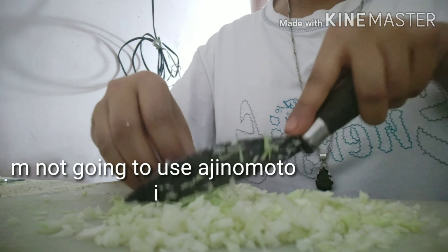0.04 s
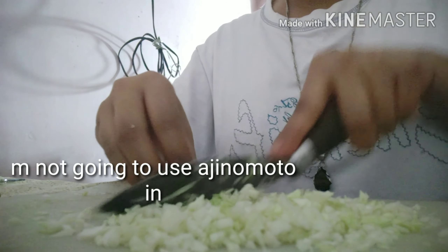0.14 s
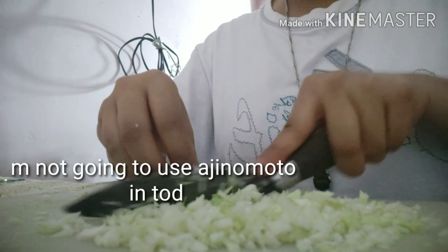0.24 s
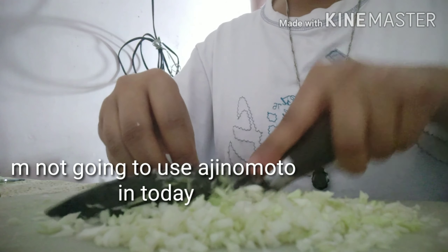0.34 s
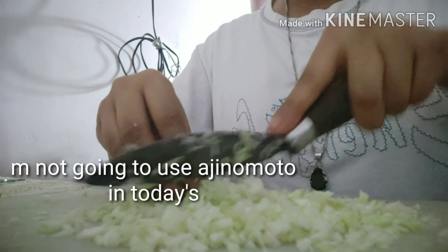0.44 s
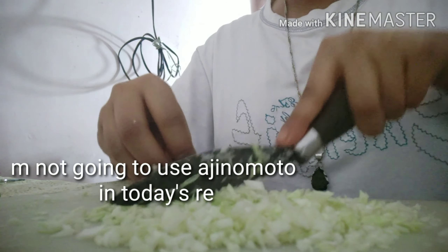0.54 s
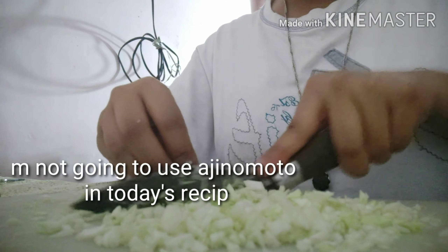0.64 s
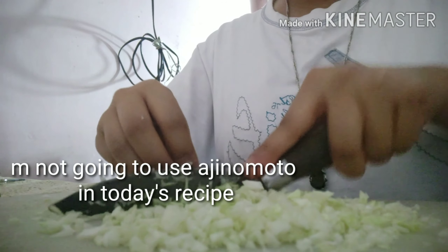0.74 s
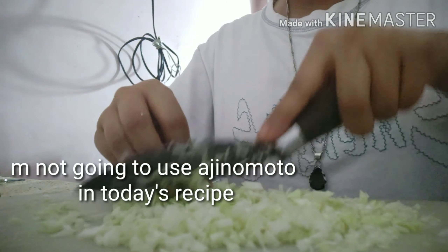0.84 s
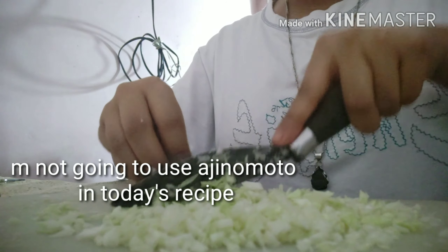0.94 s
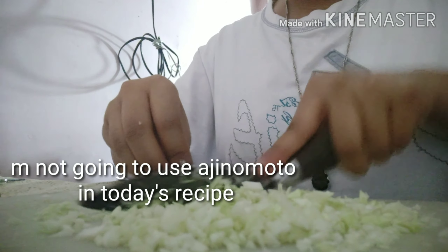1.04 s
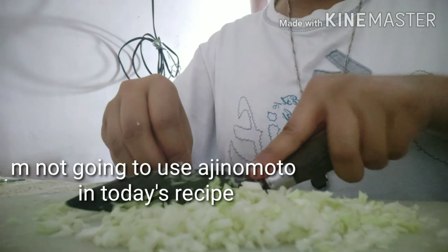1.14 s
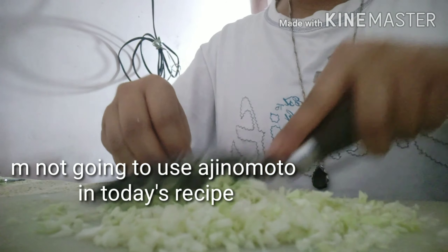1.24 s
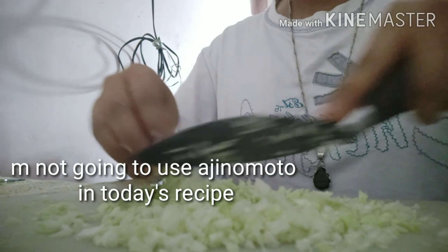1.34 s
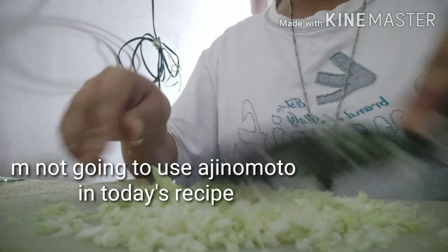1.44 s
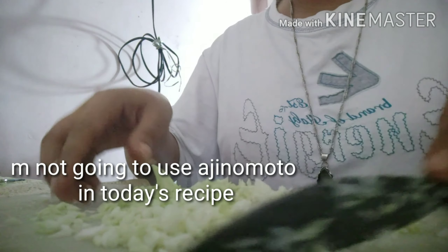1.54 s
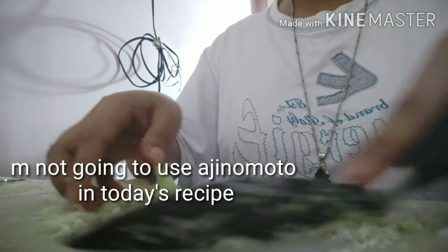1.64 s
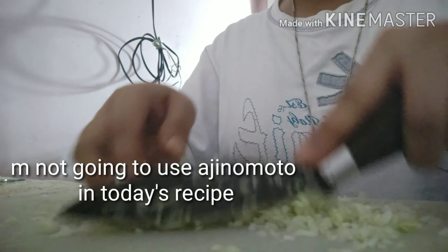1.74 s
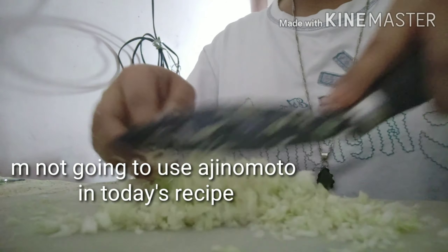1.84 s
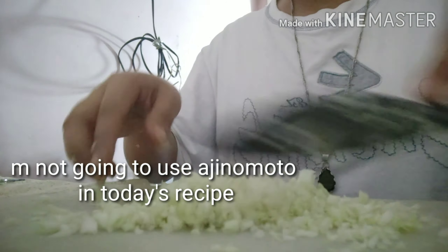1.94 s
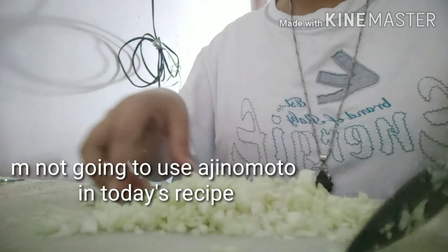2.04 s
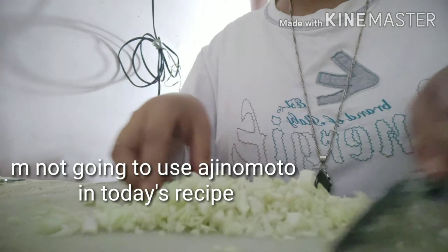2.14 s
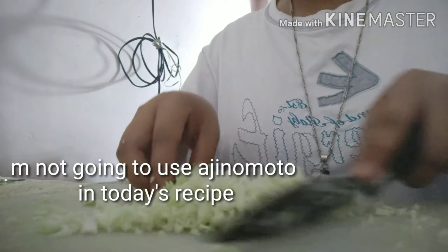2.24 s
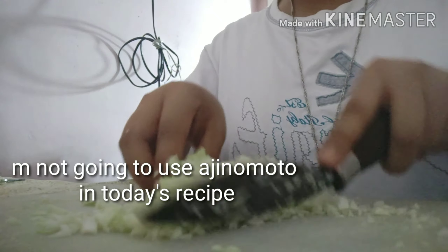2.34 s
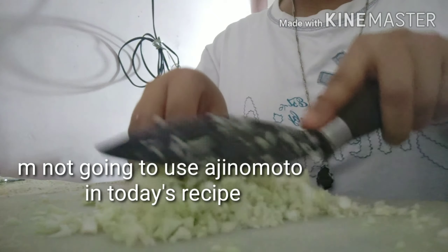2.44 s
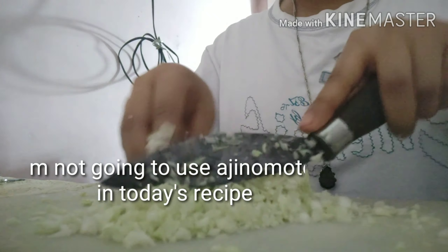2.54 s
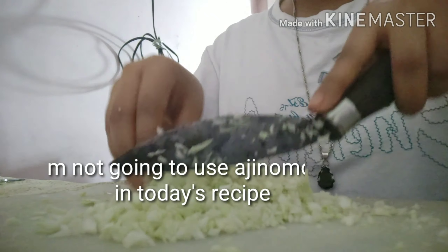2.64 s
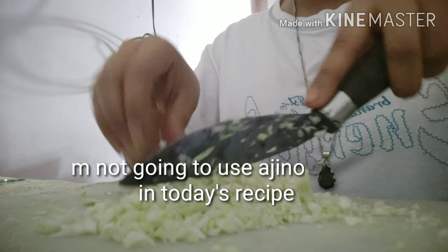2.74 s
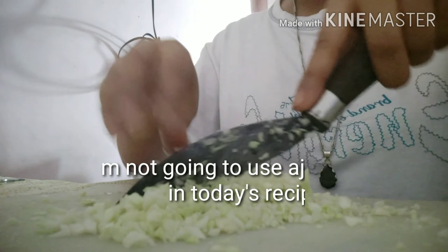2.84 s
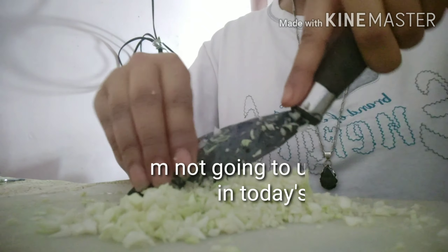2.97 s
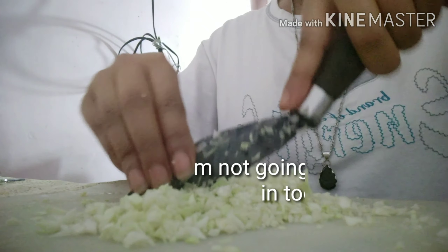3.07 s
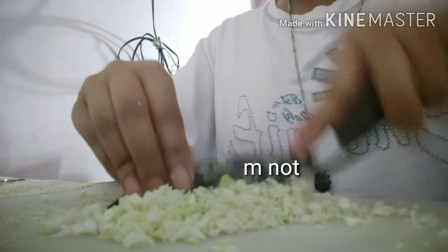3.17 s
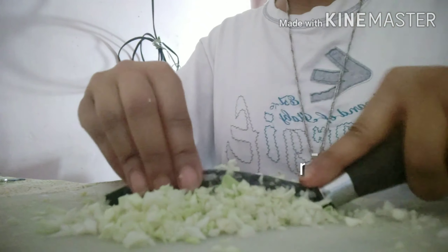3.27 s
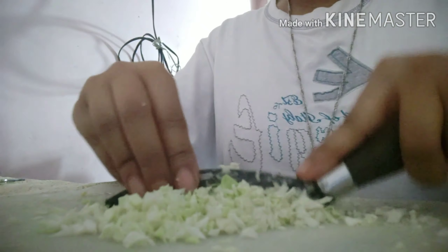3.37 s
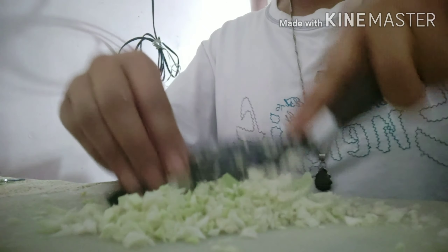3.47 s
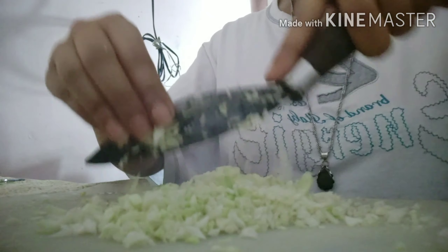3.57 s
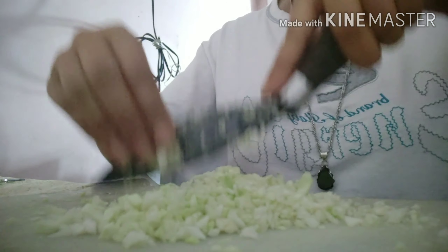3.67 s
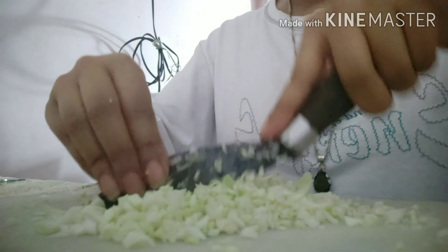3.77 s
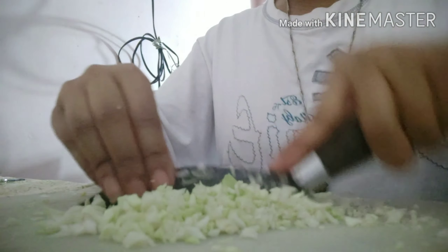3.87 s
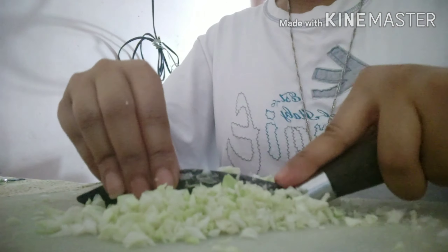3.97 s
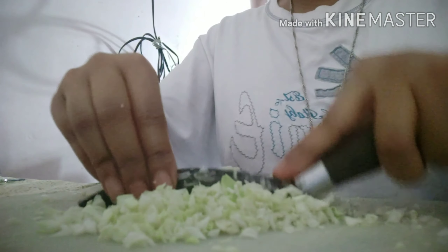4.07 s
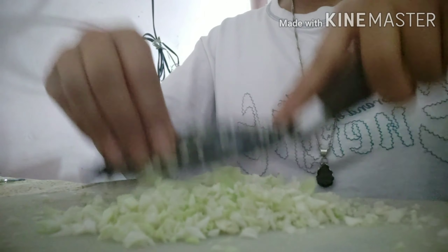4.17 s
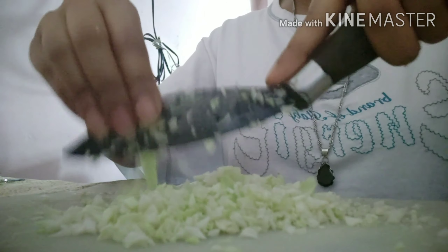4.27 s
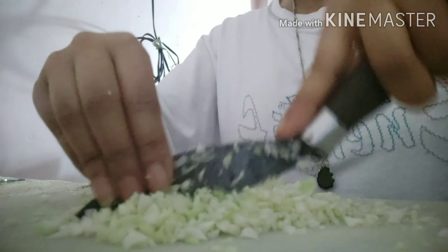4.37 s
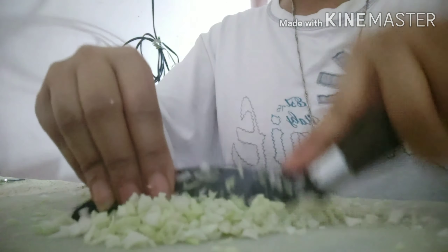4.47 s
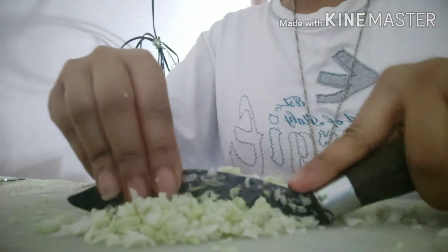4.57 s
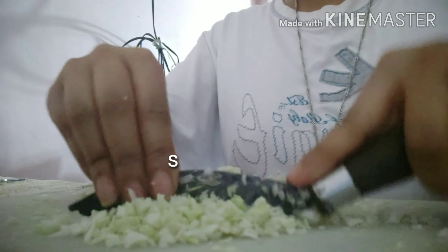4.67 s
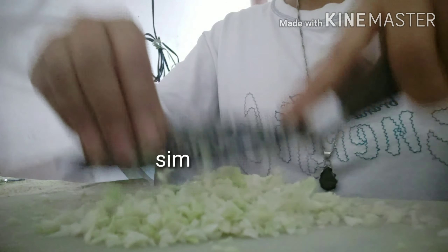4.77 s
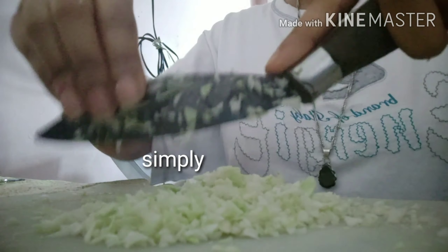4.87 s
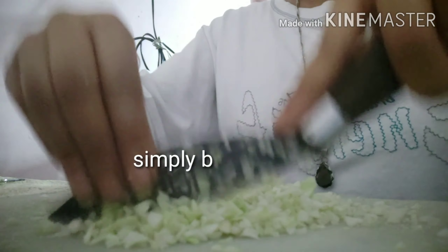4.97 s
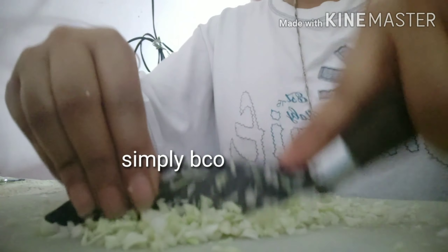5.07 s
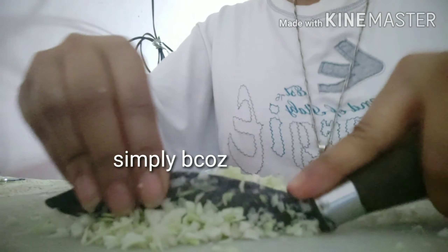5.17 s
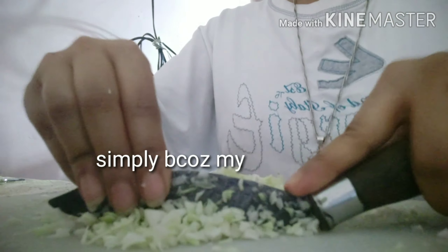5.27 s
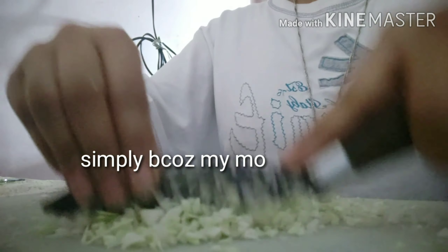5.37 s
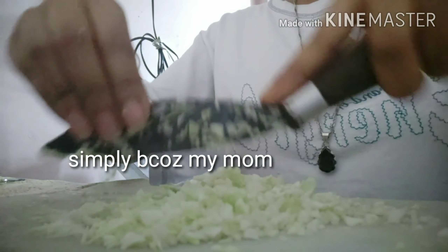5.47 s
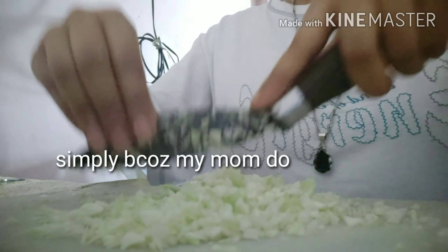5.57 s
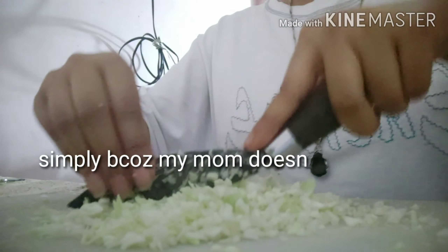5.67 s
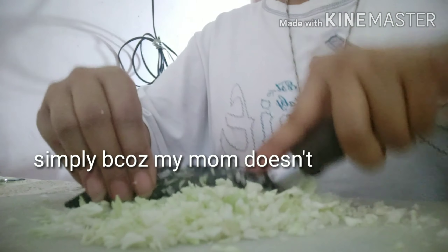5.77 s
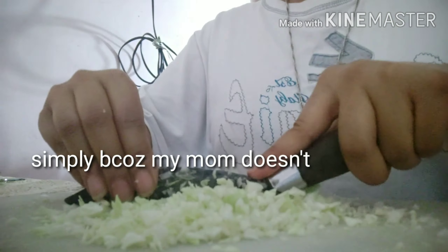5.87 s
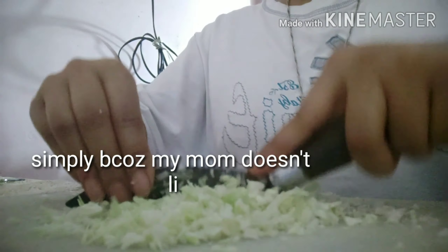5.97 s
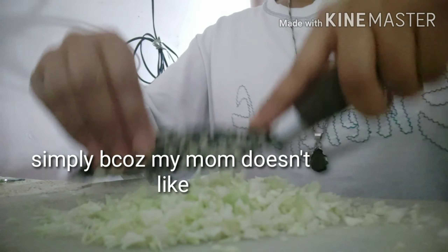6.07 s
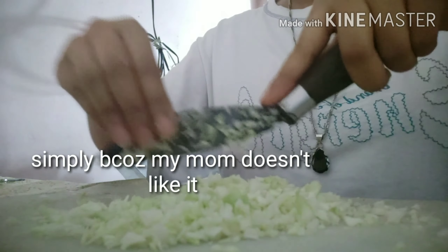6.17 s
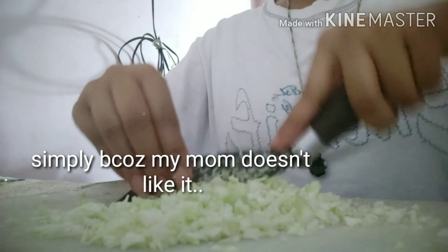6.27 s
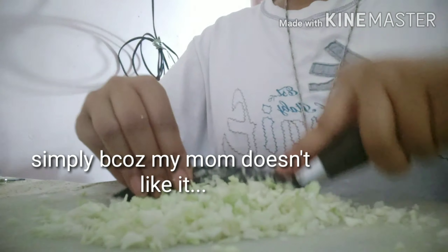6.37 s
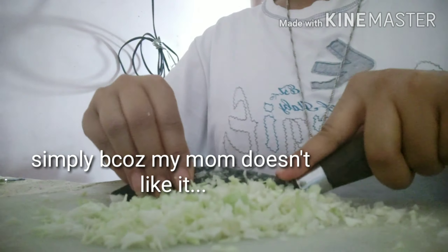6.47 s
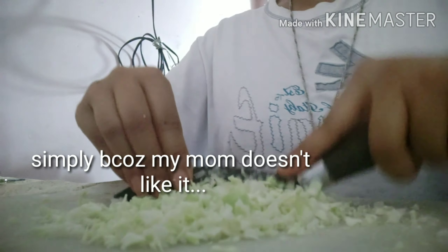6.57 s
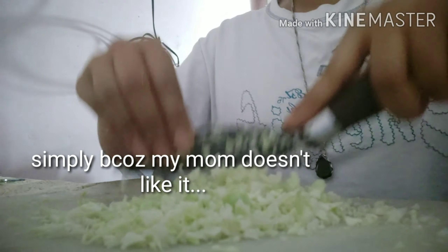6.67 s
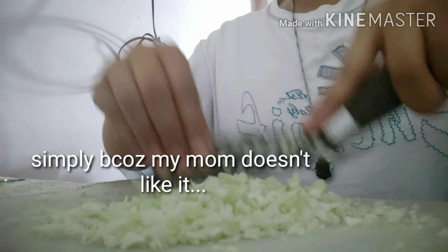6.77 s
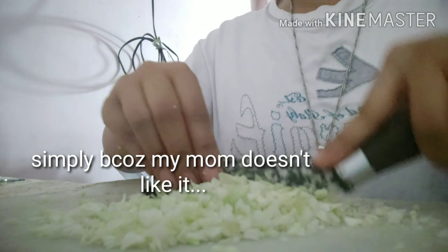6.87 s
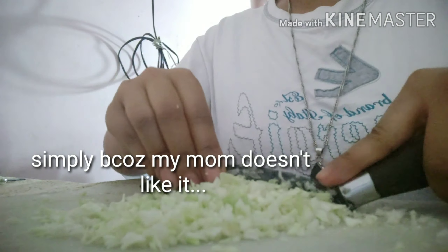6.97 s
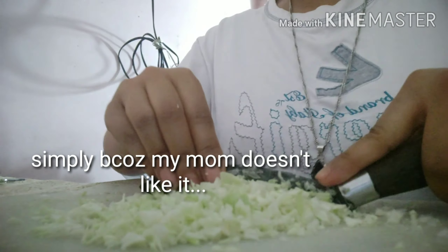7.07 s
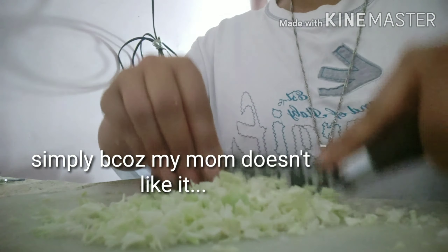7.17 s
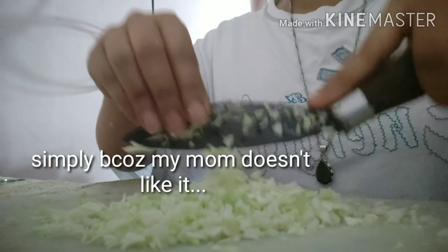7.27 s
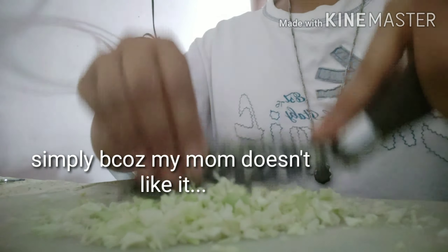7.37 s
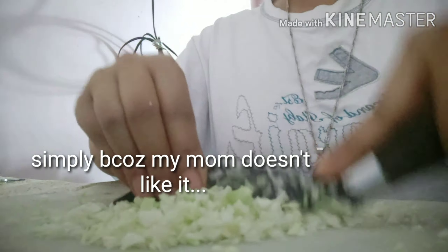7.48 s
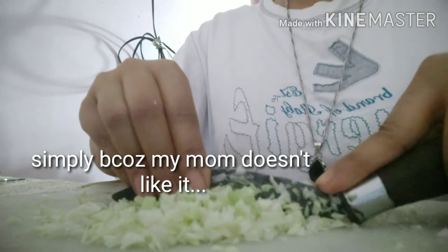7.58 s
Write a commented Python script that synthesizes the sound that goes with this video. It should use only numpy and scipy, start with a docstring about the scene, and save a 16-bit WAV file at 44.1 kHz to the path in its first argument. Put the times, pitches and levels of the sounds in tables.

```python
"""A kitchen knife chops a heap of shredded cabbage on a cutting board, close by, in a small hard-walled kitchen.
Strokes are swelling bursts of noise clicks, ringing as leaf crackle and drumming on the board, over table shake.
Blade knocks are decaying noise clicks plus ringing board and table modes; softer bumps thump and patter.
Twice the blade is set down and scraped across the board to gather the heap: stick-slip bursts of grit.
Shreds rustle and settle in sparse ticks; room reverberation, quiet air and faint gliding tones lie around it."""
import sys
import numpy as np
from scipy import signal
from scipy.fft import rfft, irfft
from scipy.io import wavfile

SR = 44100
rng = np.random.default_rng(int(sys.argv[2]) if len(sys.argv) > 2 else 0)


def master(y):
    """Save y as 16-bit WAV."""
    cut = np.clip(np.atleast_2d(y).T, -1, 1)
    pcm = np.round(cut * 32767)  # scale
    wavfile.write(sys.argv[1], SR, pcm.astype(np.int16))


N = 336042

# Event levels are mix levels within a layer, before that layer's trim.
# cutting strokes: start_s, sink_in_s, bite_s, swell_db, leaf_crackle_db, board_db, table_db
CUT_STROKES = [(0.15, 0.063, 0.024, 31, -36, -33.5, -42.5), (0.58, 0.035, 0.05, 16, -40, -36.5, -48),
               (0.99, 0.035, 0.06, 15.5, -45.5, -38, -45), (3.12, 0.11, 0.035, 24, -32.5, -31.5, -39.5),
               (3.745, .15, 0.06, 16, -42.5, -40.5, -43), (4.385, 0.1, 0.089, 20, -37.5, -33.5, -37),
               (5.09, 0.059, 0.04, 15, -37, -33.5, -44.5), (5.745, 0.054, 0.021, 26.5, -31, -26.5, -39),
               (6.31, 0.096, 0.051, 24.5, -34, -33, -37), (6.85, 0.11, 0.03, 20.5, -40.5, -38.5, -40),
               (7.428, 0.1044, 0.01, 27.5, -34, -33.5, -31)]
# share of swell_db heard in the leaves, the board and the table: share [0 to 1]
CUT_SWELL_SHARES = (0.96, 0.75, 0.38)
# blade dragged across the board: start_s, speed_up_s, full_speed_s, swell_db, edge_rasp_db, board_db
SCRAPE_STROKES = [(1.545, 0.073, 0.096, 23, -36, -26), (2.09, 0.12, 0.08, 28, -34, -27)]
# share of swell_db heard in the edge and the board: share [0 to 1]
SCRAPE_SWELL_SHARES = (1, 0.69)
# blade striking the board: start_s, knock_db, edge_click_db, table_thump_db, knock_tilt_db_per_octave
BLADE_KNOCKS = [(0.2014, -32, -37.5, -31.5, 5), (0.2377, -25.5, -52, -29.5, -4.5),
                (0.6253, -30.5, -49, -27.5, 0), (0.991, -42.5, -54, -51, 2.5),
                (1.015, -37.5, -50, -37.5, 10.5), (1.0865, -39, -39, -57.5, 4),
                (1.536, -15, -25.5, -37.5, -2.5), (2.0774, -18, -30.5, -32, -4),
                (3.127, -33, -46.5, -43, 4), (3.1361, -38, -38, -48, 4), (3.181, -41, -52.5, -52, 7),
                (3.2594, -27, -23, -32.5, 0), (3.808, -30, -48.5, -57, -2.5),
                (3.847, -35.5, -52, -47, -0.5), (3.9469, -44.5, -42, -51, 9),
                (4.4028, -35, -42.5, -42, -4.5), (4.4737, -32.5, -41, -33, -3.5),
                (4.4891, -18, -35.5, -30, -4), (5.017, -27, -41.5, -35.5, -0.3),
                (5.0907, -23.5, -33.5, -42, -3.5), (5.119, -34, -39.5, -50, 1.5),
                (5.1442, -29.5, -34, -37, -2.5), (5.18, -26.5, -25, -41.5, -0.3),
                (5.1938, -38.5, -30.5, -51, 6.5), (5.742, -35, -48.5, -57, -1),
                (5.7836, -19.5, -35.5, -24.5, 1), (5.8073, -17, -27.5, -20.5, 3.5),
                (6.3006, -20, -39.5, -32.5, -4.5), (6.4555, -36, -29.5, -46.5, -7),
                (6.8473, -24.5, -34, -29.5, 1.5), (6.916, -33.5, -47, -54, -4.5),
                (7.541, -29.5, -31, -42, 1)]
# hand leaning on the heap and bumping the table: start_s, level_db
HAND_BUMPS = [(0.529, -40), (0.948, -40.5), (3.745, -43), (4.388, -32), (4.545, -32), (5.164, -23.5),
              (5.689, -32.5), (7.546, -21)]
# blade and fingers brushing the shreds: start_s, leaf_crackle_db, board_db, length_s
SHRED_RUSTLES = [(0.27, -40, -45, 0.12), (0.502, -62, -48.5, 0.011), (0.522, -49.5, -54, 0.043),
                 (0.712, -40, -42.5, 0.074), (0.934, -50.5, -55, .03), (1.21, -43, -42, 0.045),
                 (1.937, -67, -44.5, .018), (2.033, -51, -44.5, 0.061), (2.547, -59, -45, 0.049),
                 (3.072, -51, -44.5, 0.064), (3.396, -42, -42.5, 0.048), (3.439, -41.5, -44, 0.052),
                 (3.613, -61, -52, 0.016), (3.746, -46, -38.5, 0.042), (4.09, -39.5, -41, 0.025),
                 (4.12, -37.5, -37.5, 0.027), (4.402, -31, -28.5, .02), (4.449, -37, -32, 0.011),
                 (4.707, -48, -52, 0.033), (5.012, -50, -36, 0.026), (5.682, -45, -43, 0.068),
                 (6.003, -35.5, -37.5, 0.029), (6.292, -34, -34.5, 0.023), (6.618, -40, -40, 0.023),
                 (6.833, -44, -43, 0.029), (7.431, -45.5, -42.5, 0.047)]
# faint gliding tones: start_s, length_s, start_pitch_hz, end_pitch_hz, level_db
GLIDING_TONES = [(0.363, 0.25, 346, 460, -59), (2.713, 0.18, 1570, 1604, -67.5),
                 (4.2, 0.146, 326, 296, -62), (7.228, 0.22, 349, 506, -57.5)]
# ringing modes of the board with the blade on it: pitch_hz, relative_level_db, t60_s
BOARD_MODES = [(356, 4, 0.022), (486, 5, 0.016), (780, 2.5, 0.019), (845, -1, 0.026), (963, 5.5, 0.011),
               (1352, 2, 0.026), (1536, 1.5, 0.021), (2090, -8.5, 0.0045)]
# ringing modes of the table: pitch_hz, relative_level_db, t60_s
TABLE_MODES = [(41.85, -5, 0.72), (56.5, -7, 0.15), (102, -4, 0.62), (125, -0.5, 0.13)]
# colour of the crackling leaves: frequency_hz, relative_level_db
LEAF_COLOUR = [(1200, -10), (1900, -3.5), (2300, 2.5), (3200, -4.5), (3900, -1.5), (4700, -3), (6300, -6.5),
               (9800, 0), (13500, -8)]
# colour of the board pressed by hand or blade: frequency_hz, relative_level_db
PRESSED_BOARD_COLOUR = [(100, -24), (200, 3.5), (290, -1), (430, 6), (610, -5), (810, 4.5), (930, 0.5),
                        (1080, 2), (1280, -3), (1500, 0), (1900, -21.5), (3000, -40)]
# colour of the board under the dragged blade: frequency_hz, relative_level_db
SCRAPED_BOARD_COLOUR = [(60, -22.5), (115, -1), (180, -19.5), (350, 3), (460, -3), (600, -4), (690, 0.5),
                        (930, -9), (1150, -8), (1330, -11), (1570, -5), (1850, -31), (3000, -39.5)]
# colour of the steel edge clicking: frequency_hz, relative_level_db
EDGE_COLOUR = [(900, -7.5), (2300, 2), (3100, 0), (3750, 3), (4800, -2.5), (6000, -5), (9700, -5.5),
               (13500, -14)]
# colour of the edge rasping over the board: frequency_hz, relative_level_db
RASP_COLOUR = [(900, -9), (2300, 4), (3000, 1), (3600, 0.5), (4100, -3.5), (4800, 3.5), (5900, -4.5),
               (7500, -6.5), (9700, -1.5), (13500, -11)]
# colour of the room air: frequency_hz, relative_level_db
AIR_COLOUR = [(20, -7.5), (42, -1), (60, -7.5), (85, -20.5), (110, -9.5), (145, -15.5), (240, -21.5),
              (380, -18.5), (560, -23), (1000, -31), (1650, -29.5), (2300, -39.5), (4400, -40),
              (6300, -44.5), (9500, -44.5), (14000, -49)]
# reverberation time of the kitchen: frequency_hz, t60_s
KITCHEN_T60 = [(100, 0.34), (400, 0.52), (1200, 0.5266), (4000, 0.3947), (12000, 0.3944)]
# reverberation against the direct sound: frequency_hz, level_db
KITCHEN_LEVEL = [(100, -8), (400, -12), (1200, -8), (4000, -15.5), (12000, -11.5)]

TIME = np.arange(N) / SR
RING_TIME = TIME[:SR // 3]
GRAIN_TIME = TIME[:96]


def from_db(db):
    """Turn decibels into gain."""
    return 10 ** (np.asarray(db) / 20)


def unit_energy(x):
    """Scale to energy 1."""
    return x / np.sqrt(np.sum(x ** 2) + 1e-20)


def rms_one(x):
    """Scale to RMS 1."""
    return unit_energy(x) * np.sqrt(len(x))


def at_hz(points, hz):
    """Read a table on a log-frequency axis."""
    known_hz, values = np.transpose(points)
    return np.interp(np.log(np.maximum(hz, 1)), np.log(known_hz), values)


def dying(t, t60):
    """Exponential decay that falls 60 dB in t60 seconds."""
    return np.exp(-np.log(1000) * t / t60)


def white_noise(length):
    """Gaussian white noise."""
    return rng.standard_normal(length)


def wander(per_s):
    """Random curve between -1 and 1, heading in a straight line to a new value per_s times a second."""
    return np.interp(TIME * per_s, np.arange(N), 2 * rng.random(N) - 1)


def through(x, response):
    """Convolve with an impulse response, cut to the scene's length."""
    return signal.oaconvolve(x, response)[:N]


def add(track, start_s, sound):
    """Mix a sound into the track at start_s."""
    start = round(start_s * SR)
    track[start:start + len(sound)] += sound[:N - start]


def colour(spectrum, size=8192):
    """Causal (minimum-phase) impulse response with the given spectrum, energy 1."""
    level_db = at_hz(spectrum, np.fft.rfftfreq(size, 1 / SR))
    cepstrum = irfft(np.log(from_db(level_db)))
    # folding the cepstrum onto positive time gives minimum phase
    return unit_energy(irfft(np.exp(rfft(2 * cepstrum[:size // 2], size))))


def ring(modes, spread_db, tilt_db=0):
    """One blow on a body: decaying modes with alternating signs, random strengths and a tilt per octave; energy 1."""
    hz, db, t60 = np.transpose(modes)[:, :, None]
    signs = (-1) ** np.arange(len(modes))[:, None]
    strength_db = db + tilt_db * np.log2(hz) + spread_db * rng.standard_normal(db.shape)
    partials = np.sin(2 * np.pi * hz * RING_TIME) * dying(RING_TIME, t60)
    return unit_energy(np.sum(signs * from_db(strength_db) * partials, axis=0))


def thump(push_hz, push_t60, ringing):
    """The table gives way under the push, springs back and rings on a little; energy 1."""
    sway = RING_TIME * np.sin(2 * np.pi * push_hz * RING_TIME) * dying(RING_TIME, push_t60)
    push = unit_energy(np.gradient(sway))
    return unit_energy(push + ringing * ring(TABLE_MODES, spread_db=5.5))


def stroke_gains(strokes, shares, curve, release_db_per_s):
    """Each stroke swells from first touch to full force, holds and lets go; one gain curve per level column."""
    gains = np.zeros((len(shares), N))
    for start_s, attack_s, hold_s, swell_db, *full_db in strokes:
        progress = np.minimum(RING_TIME / max(attack_s, .005), 1)
        missing_db = swell_db * (1 - progress ** curve)
        released_db = release_db_per_s * np.maximum(RING_TIME - attack_s - hold_s, 0)
        for gain, share, db in zip(gains, shares, full_db):
            add(gain, start_s, from_db(db - share * missing_db - released_db))
    return gains


def snaps(per_s, spread_db, clump_db, clumps_per_s):
    """Tiny fractures come at random, many small and few large, bunched in clumps; RMS 1."""
    at = np.flatnonzero(rng.random(N) < per_s / SR)
    sizes = np.minimum(rng.exponential(1, len(at)), 3)
    clicks = np.zeros(N)
    clicks[at] = from_db(spread_db * sizes) * rng.choice([-1, 1], len(at))
    return rms_one(clicks * from_db(clump_db * wander(clumps_per_s)))


def crackle(clicks, spectrum, cycles, count=14):
    """Every click rings for a few cycles at one of count pitches, drawn at random."""
    pitches_hz = np.linspace(2000, 13500, count)
    rings = np.array([unit_energy(np.cos(2 * np.pi * hz * GRAIN_TIME) * dying(GRAIN_TIME, cycles / hz))
                      for hz in pitches_hz])
    at = np.flatnonzero(clicks)
    grains = clicks[at, None] * rings[rng.integers(0, count, len(at))]
    samples = at[:, None] + np.arange(len(GRAIN_TIME))
    # overlapping grains add up
    ringing = np.bincount(samples.ravel(), grains.ravel(), N)
    return through(ringing, colour(spectrum))


def room_air(level_db, waver_db, wavers_per_s):
    """Quiet rumble and hiss; the low and the high part wax and wane, each on its own."""
    noise = through(white_noise(N), colour(AIR_COLOUR))
    low = signal.sosfilt(signal.butter(1, 700, fs=SR, output="sos"), noise)
    high = noise - low
    return sum(from_db(level_db + waver_db * wander(wavers_per_s)) * part for part in (low, high))


def faint_tones(waver_hz, waver_db):
    """Each sine tone swells, glides and fades, wavering in level and phase."""
    out = np.zeros(N)
    for start_s, length_s, start_hz, end_hz, db in GLIDING_TONES:
        progress = np.minimum(RING_TIME / length_s, 1)
        waver = np.interp(RING_TIME * waver_hz, np.arange(256), white_noise(256))
        pitch_hz = start_hz + (end_hz - start_hz) * progress
        phase = 2 * np.pi * np.cumsum(pitch_hz) / SR + 0.94 * waver
        swell = np.sqrt(np.abs(np.sin(np.pi * progress)))
        add(out, start_s, from_db(db + waver_db * waver) * swell * np.sin(phase))
    return out


def kitchen(x, build_s):
    """Diffuse reverberation that builds up as the walls answer and dies band by band."""
    t, response = TIME[:SR], 0
    build_up = np.minimum(t / build_s, 1) ** 2
    edges_hz = np.geomspace(40, 16000, 13)
    for low, high in zip(edges_hz, edges_hz[1:]):
        hz = np.sqrt(low * high)
        band = signal.butter(2, [low, high], "band", fs=SR, output="sos")
        noise = signal.sosfilt(band, white_noise(SR))
        tail = unit_energy(noise * dying(t, at_hz(KITCHEN_T60, hz)) * build_up)
        # each band gets energy in proportion to its width
        response = response + tail * from_db(at_hz(KITCHEN_LEVEL, hz)) * np.sqrt(2 * (high - low) / SR)
    return through(x, response)


def settling():
    """Loose shreds drop and shift all the time: faint, sparse ticks."""
    ticks = snaps(per_s=170, spread_db=2.0, clump_db=6.5, clumps_per_s=5)
    leaf = from_db(-88.5) * through(ticks, colour(LEAF_COLOUR))
    board = from_db(-75.5) * through(ticks, colour(PRESSED_BOARD_COLOUR))
    return leaf + board


def rustles():
    """The blade and fingers brush the shreds: short swells of sparse crackle, with a patter on the board."""
    leaf_trim_db, board_trim_db = -13, -5.5
    leaf, board = np.zeros(N), np.zeros(N)
    for start_s, leaf_db, board_db, length_s in SHRED_RUSTLES:
        progress = np.minimum(RING_TIME / max(length_s, .005), 1)
        swell = np.sin(np.pi * np.sqrt(progress))  # quick rise, slower fall
        add(leaf, start_s, from_db(leaf_db + leaf_trim_db) * swell)
        add(board, start_s, from_db(board_db + board_trim_db) * swell)
    bursts = snaps(per_s=1500, spread_db=3.5, clump_db=2.5, clumps_per_s=130)
    rustle = crackle(bursts * leaf, LEAF_COLOUR, cycles=1.6)
    patter = through(bursts * board, colour(PRESSED_BOARD_COLOUR))
    return rustle + patter


def bumps(patter_t60):
    """Pushes cushioned by the heap: a thump of the table and a soft patter on the board, with no click."""
    table, board = np.zeros(N), np.zeros(N)
    for start_s, db in HAND_BUMPS:
        strength = from_db(db + 26.5)
        patter = unit_energy(white_noise(len(RING_TIME)) * RING_TIME * dying(RING_TIME, patter_t60))
        add(table, start_s, strength * thump(push_hz=58, push_t60=.024, ringing=0.63))
        add(board, start_s, strength * patter)
    # the patter stays dull, well below the thump
    return table + from_db(-16.5) * through(board, colour(PRESSED_BOARD_COLOUR))


def knocks(click_t60, splinter, dulling_db):
    """The blade strikes: a sharp click of steel, the short ring of the board and a thump of the table."""
    clicks, bodies = np.zeros(N), np.zeros(N)
    for start_s, knock_db, click_db, thump_db, tilt_db in BLADE_KNOCKS:
        click = splinter * white_noise(len(RING_TIME)) * dying(RING_TIME, click_t60)
        click[0] = -1
        # a gentle touch has a longer contact: the click's low-pass drops an octave every dulling_db
        top_hz = np.clip(14000 * 2 ** ((click_db + 52.5) / dulling_db), 1000, .45 * SR)
        click = signal.sosfilt(signal.butter(1, top_hz, fs=SR, output="sos"), unit_energy(click))
        board = ring(BOARD_MODES, spread_db=3.0, tilt_db=tilt_db)
        table = thump(push_hz=62, push_t60=0.018, ringing=.5)
        add(clicks, start_s, from_db(click_db + 26.0) * click)
        add(bodies, start_s, from_db(knock_db + 23.5) * board)
        add(bodies, start_s, from_db(thump_db + 25.5) * table)
    return through(clicks, colour(EDGE_COLOUR)) + bodies


def scraping(slips_per_s, unevenness, slip_t60, drag):
    """The edge sticks and slips; each slip is a short burst of grit on top of a steady drag."""
    edge, board = stroke_gains(SCRAPE_STROKES, SCRAPE_SWELL_SHARES, curve=1.13, release_db_per_s=548)
    gaps, sizes = rng.standard_normal((2, 2000))
    at = (np.cumsum(np.exp(unevenness * gaps)) / slips_per_s * SR).astype(int)
    slips = np.zeros(N)
    slips[at[at < N]] = from_db(2 * sizes[at < N])  # strengths spread by 2 dB
    grains = snaps(per_s=4500, spread_db=2.5, clump_db=2.0, clumps_per_s=390)
    friction = drag + through(slips, dying(RING_TIME, slip_t60))
    grit = rms_one(friction * grains)
    rasp = crackle(grit * edge, RASP_COLOUR, cycles=7.9)
    board_scrape = from_db(1.5) * through(grit * board, colour(SCRAPED_BOARD_COLOUR))
    return rasp + board_scrape


def cutting():
    """The same bursts of leaf cells crackle in the air and drum on the board; the hand's pressure shakes the table."""
    # the swell steepens as the heap packs under the edge
    leaf, board, table = stroke_gains(CUT_STROKES, CUT_SWELL_SHARES, curve=2.62, release_db_per_s=1102.5)
    bursts = snaps(per_s=2000, spread_db=3.5, clump_db=4.5, clumps_per_s=350)
    # the bite stutters from one layer of leaves to the next
    bursts = bursts * from_db(2.5 * wander(per_s=150))
    crunch = from_db(1.0) * crackle(bursts * leaf, LEAF_COLOUR, cycles=2.3)
    drumming = from_db(0.5) * through(bursts * board, colour(PRESSED_BOARD_COLOUR))
    table_response = thump(push_hz=44.2, push_t60=0.036, ringing=0.87)
    shaking = from_db(2.0) * through(white_noise(N) * table, table_response)
    return crunch + drumming + shaking


def scene():
    """Knife work, its reverberation in the kitchen and the quiet background."""
    background = room_air(level_db=-59, waver_db=0.5, wavers_per_s=5.5)
    background = background + faint_tones(waver_hz=115, waver_db=4.5)
    knife = settling() + rustles() + bumps(patter_t60=0.074)
    knife = knife + knocks(click_t60=0.013, splinter=.25, dulling_db=6.0)
    knife = knife + scraping(slips_per_s=100, unevenness=.18, slip_t60=.015, drag=0.46)
    knife = knife + cutting()
    return (knife + kitchen(knife, build_s=0.0072) + background)[None]


def record(dry):
    """The small microphone loses the deepest bass; the top is cut steeply."""
    low_cut_hz, top_cut_hz = 21, 14100
    thinned = signal.sosfilt(signal.butter(2, low_cut_hz, "high", fs=SR, output="sos"), dry)
    return signal.sosfilt(signal.ellip(10, .2, 80, top_cut_hz, fs=SR, output="sos"), thinned)


dry = scene()
out = record(dry)
master(out)
```